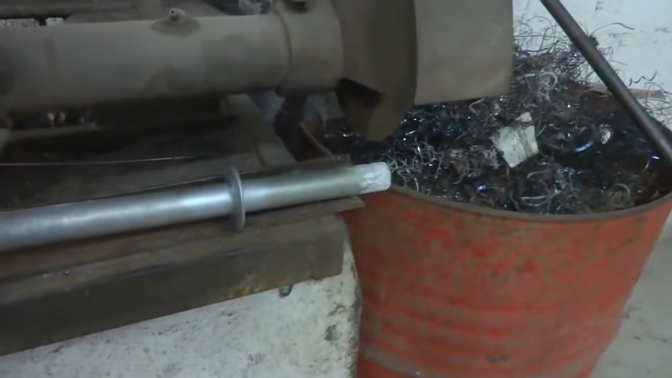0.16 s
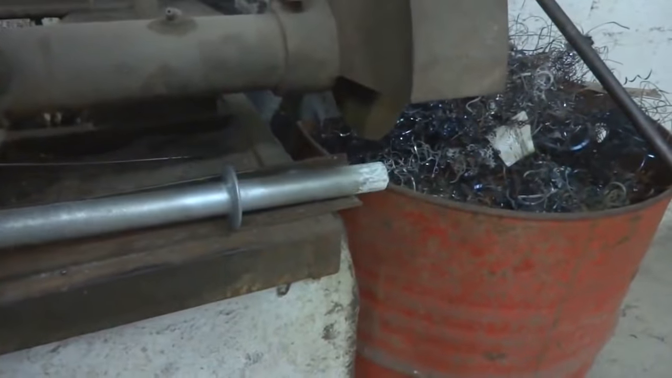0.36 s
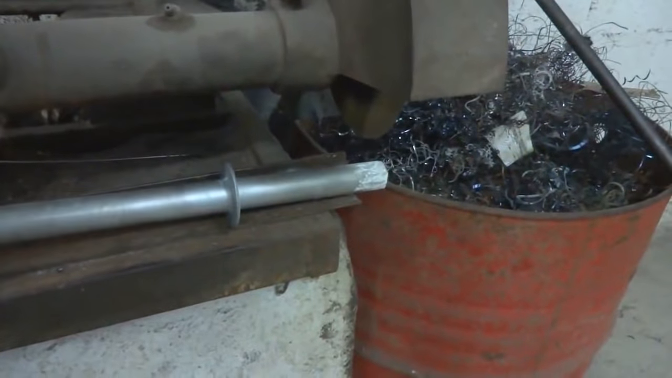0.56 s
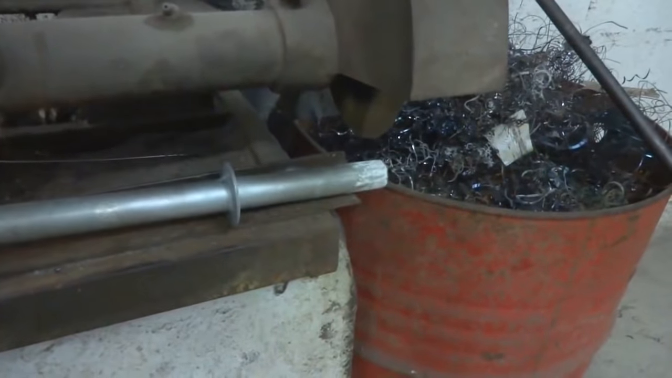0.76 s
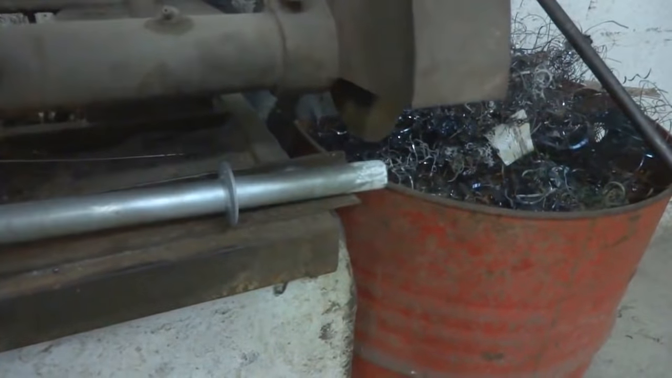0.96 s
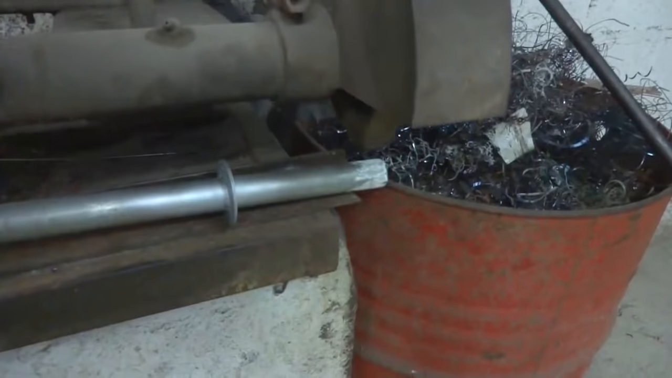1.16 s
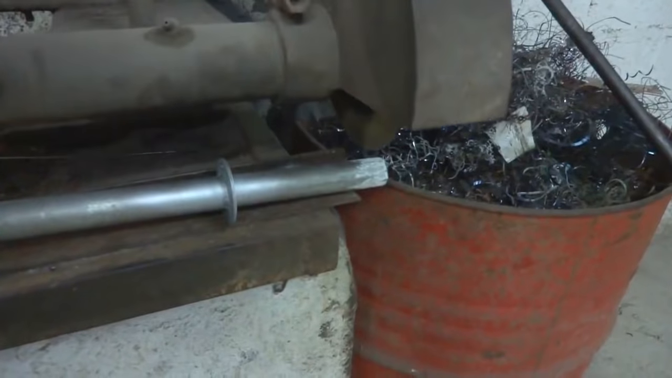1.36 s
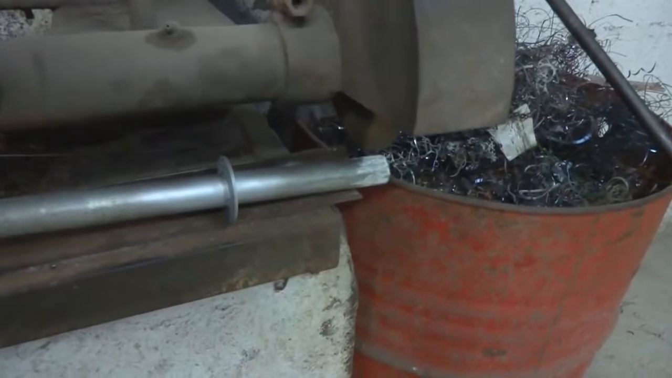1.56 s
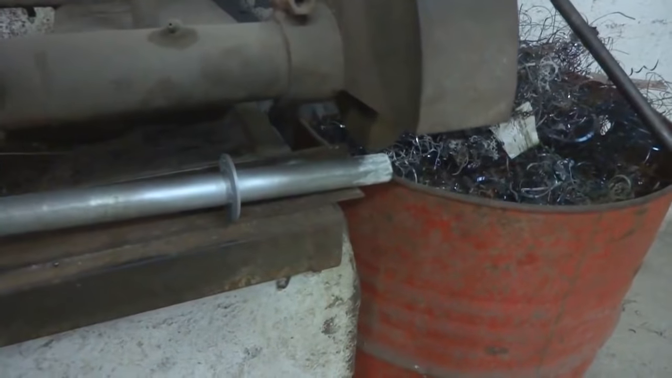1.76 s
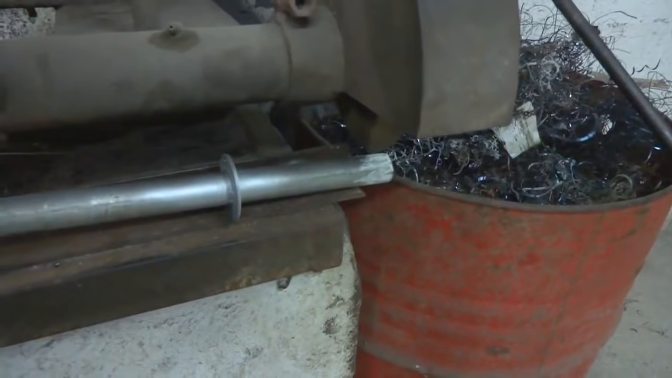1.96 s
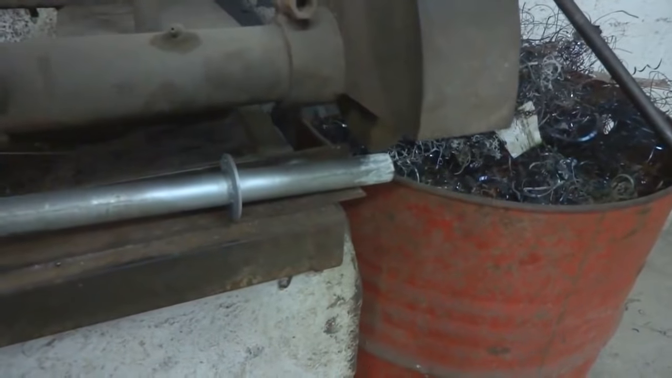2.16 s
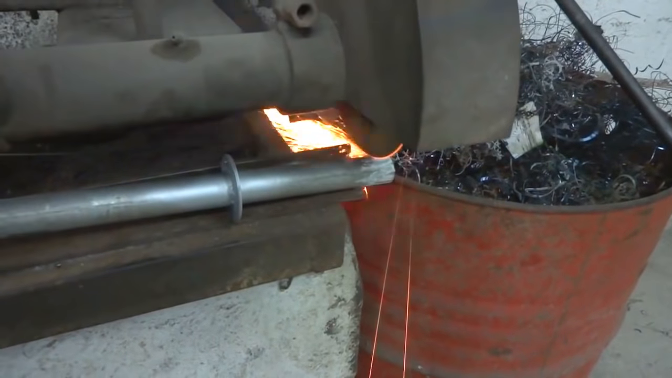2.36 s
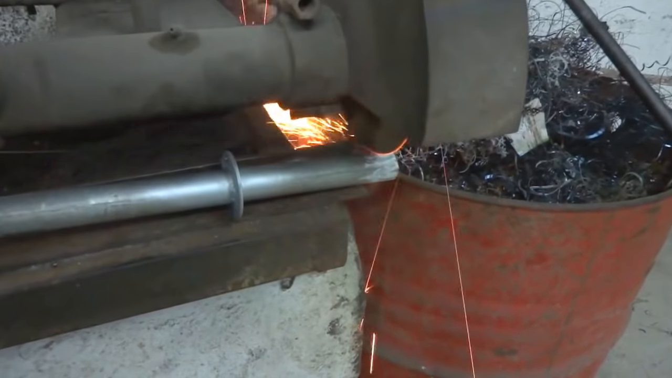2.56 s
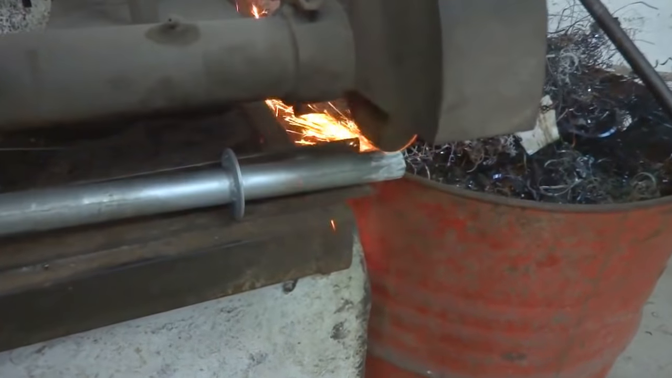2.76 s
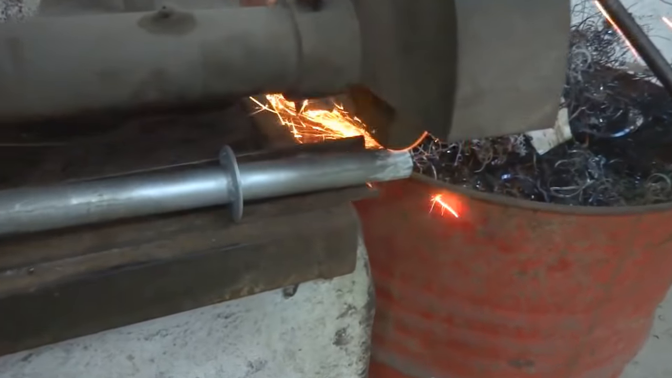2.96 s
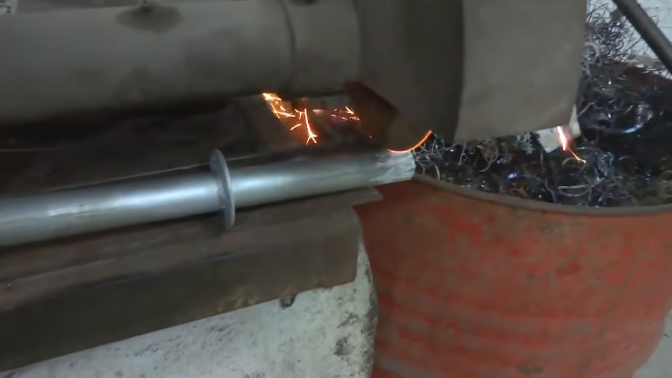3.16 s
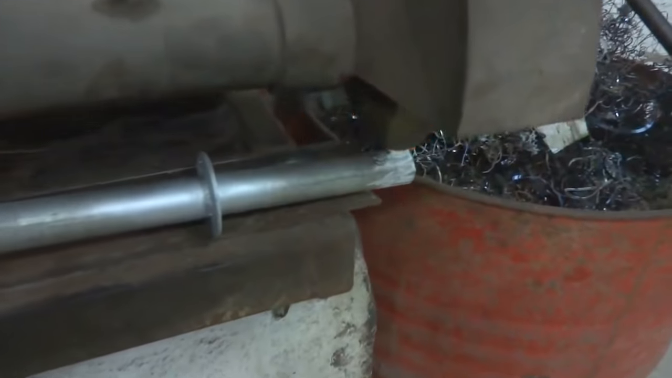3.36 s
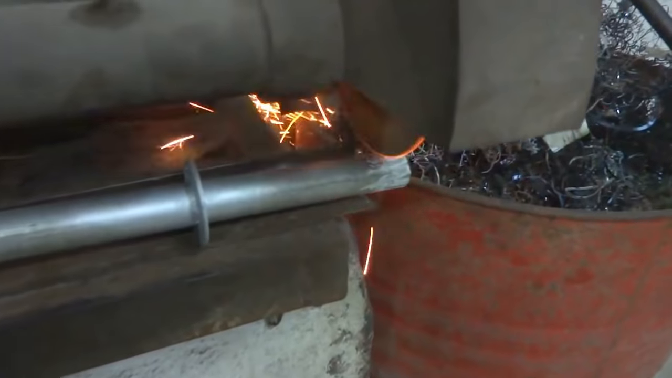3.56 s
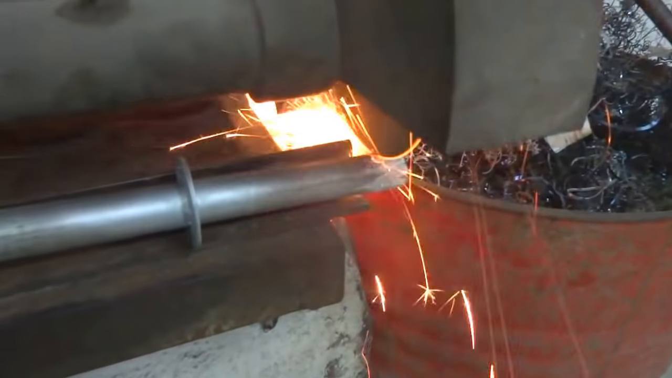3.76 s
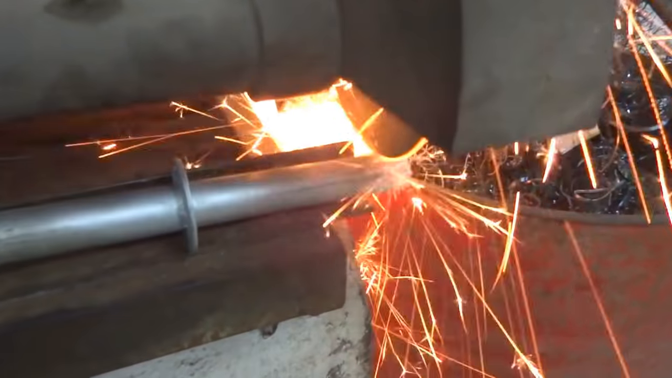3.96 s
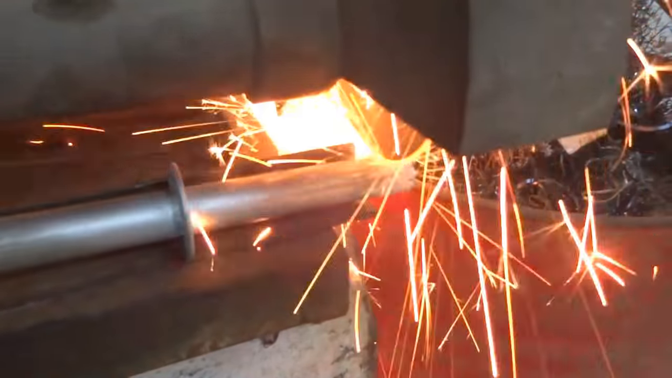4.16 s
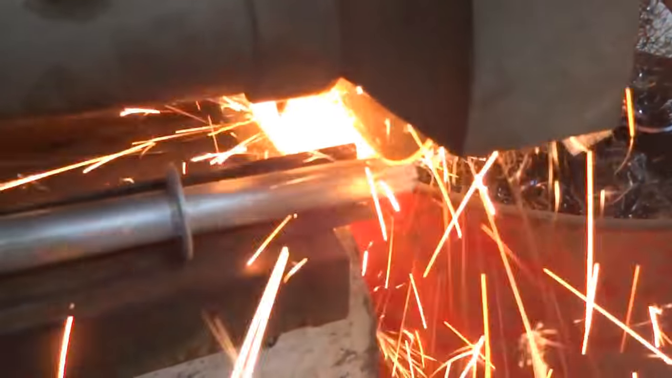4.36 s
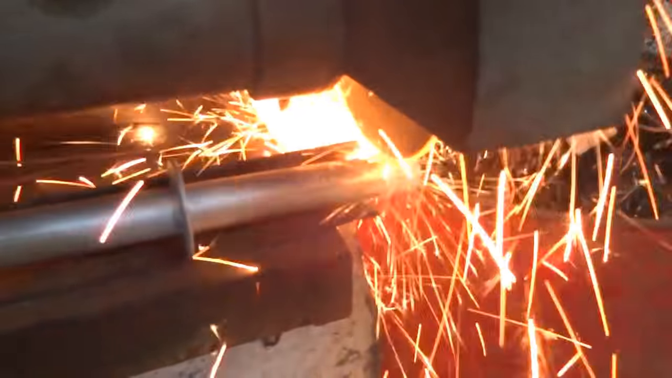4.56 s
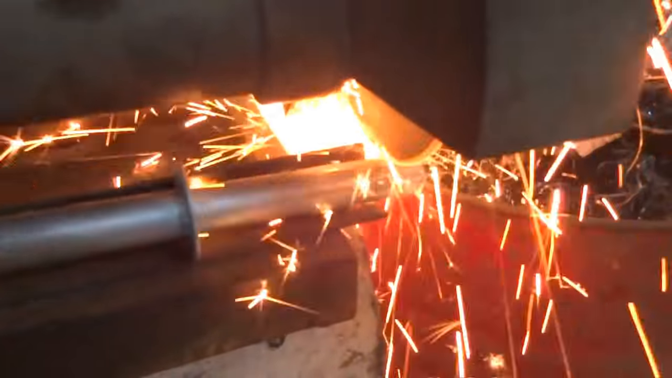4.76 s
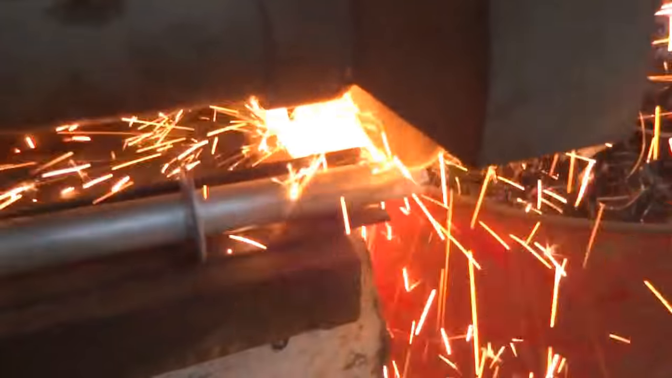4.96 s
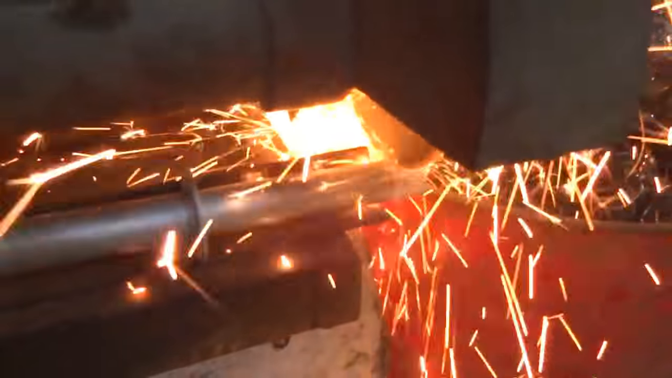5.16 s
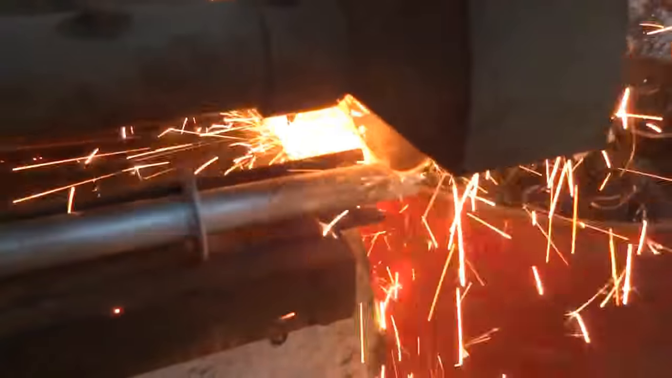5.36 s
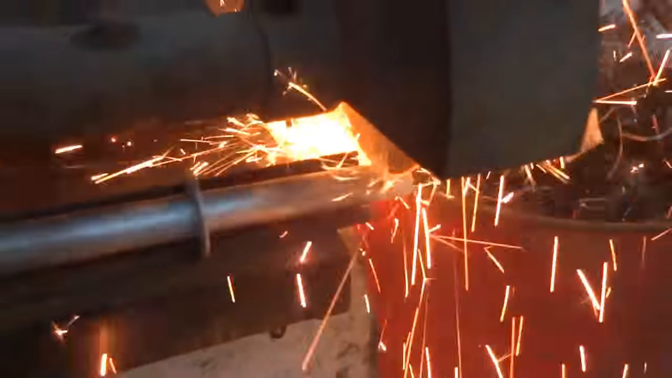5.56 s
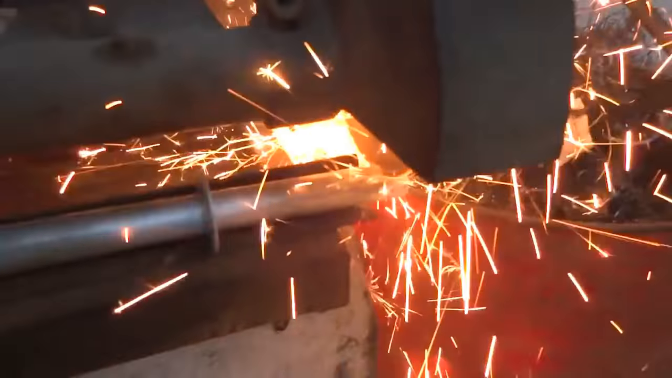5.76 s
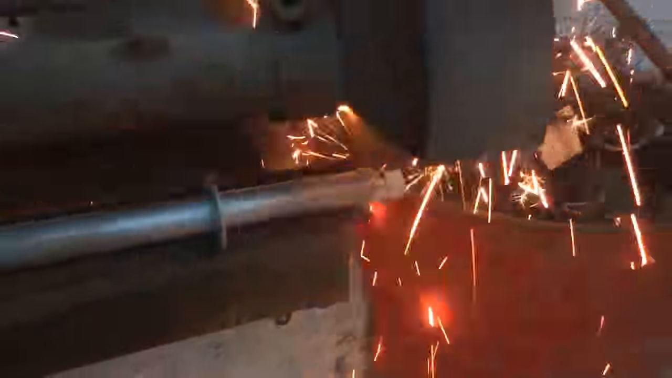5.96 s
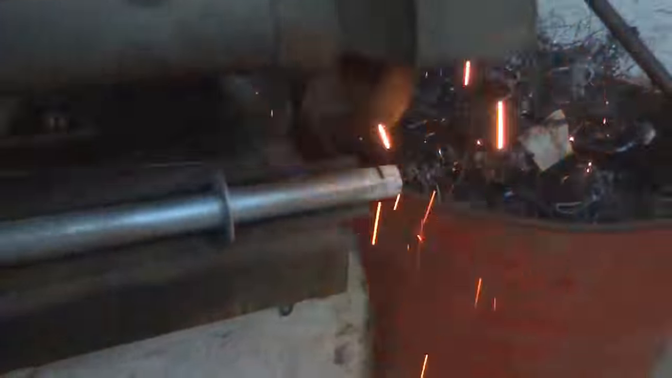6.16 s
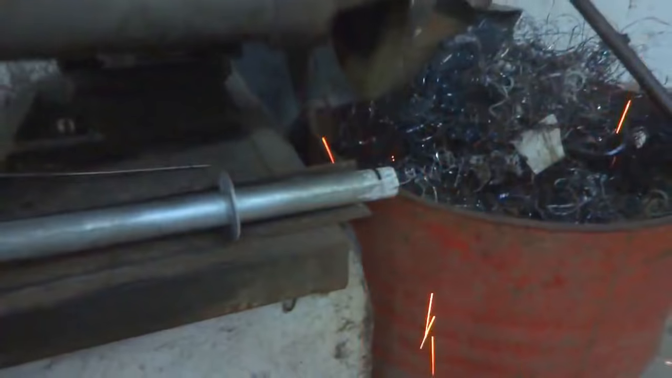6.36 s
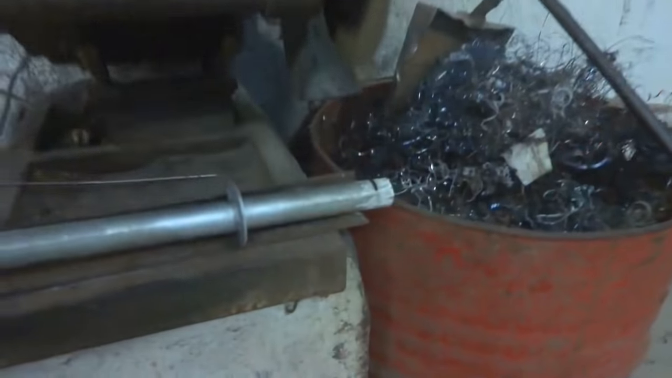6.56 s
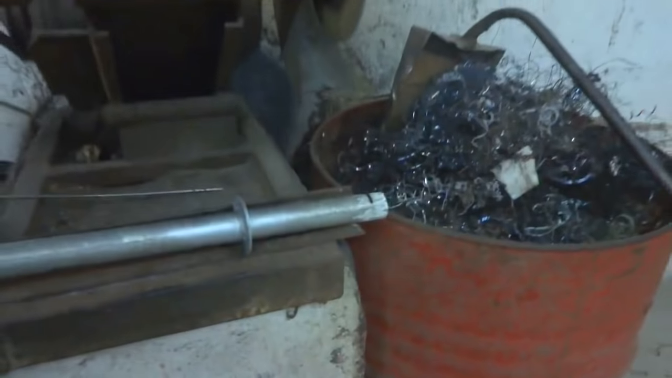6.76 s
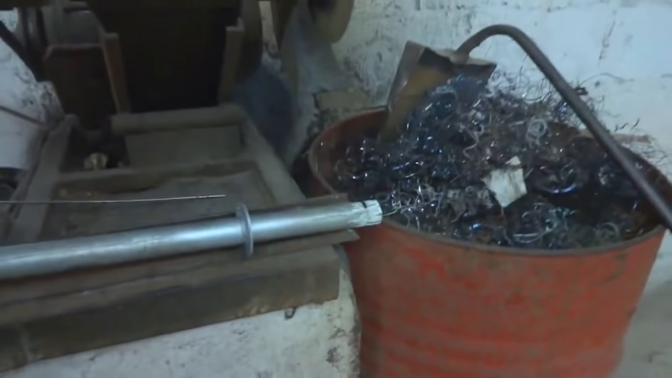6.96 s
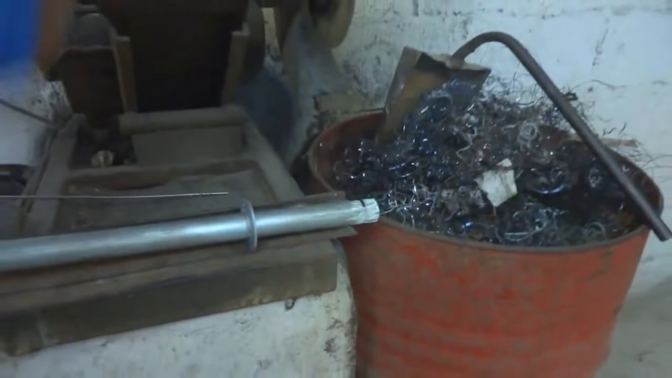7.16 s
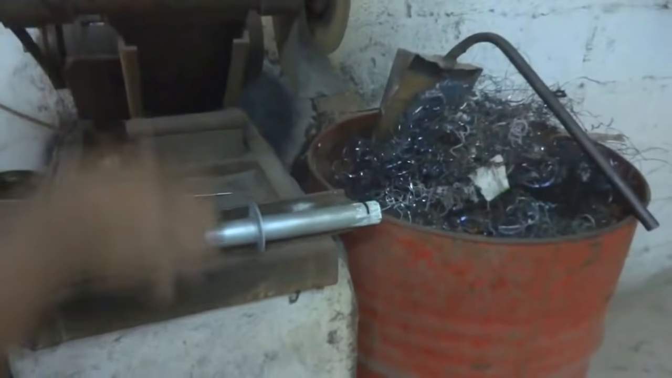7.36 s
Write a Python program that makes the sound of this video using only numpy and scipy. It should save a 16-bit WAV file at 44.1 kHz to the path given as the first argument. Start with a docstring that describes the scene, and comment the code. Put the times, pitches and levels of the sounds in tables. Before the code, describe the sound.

Whining motor and rattling housing idle, an abrasive wheel stutters against steel, then screams through a long cut before the arm rises and bumps its stop.

```python
"""A belt-driven abrasive cut-off saw in a small workshop, heard from about a metre.
The drive idles, humming and rattling its housing in step with motor and belt; the slack belt slaps its cover.
The wheel skips on a steel pipe, lifts, then sinks in for one long cut: revolving grit excites the modes of
pipe and guard, narrow modes swell and squeal, and the wheel slows under load.
Steel rings on as the arm swings up; the arm bumps its stop, struck modes ring, and pulsing tones drone there."""
import sys
import numpy as np
from scipy import signal
from scipy.fft import rfft, irfft
from scipy.io import wavfile
from scipy.ndimage import uniform_filter1d, map_coordinates

SR = 44100
rng = np.random.default_rng(int(sys.argv[2]) if len(sys.argv) > 2 else 0)


def to_wav(sig):
    """Store sig (one row per channel, or 1-D mono) as 16-bit WAV at the path in sys.argv[1].

    Samples outside -1..1 are clipped; the rate is SR.
    """
    pcm = np.clip(np.atleast_2d(sig), -1, 1) * 32767
    pcm = np.round(pcm).astype(np.int16)
    wavfile.write(sys.argv[1], SR, pcm.T)  # frames by channels


N = 327222
T = np.arange(N) / SR
FREQ = np.maximum(np.arange(N + 1) * SR / (2 * N), 1)

MOTOR_HZ = 24.92  # mean turns per second
# arm meeting its stop: (time [s], level [dB])
KNOCKS = [(6.885, -36), (6.916, -44)]


def undb(db):
    """Decibels to gain."""
    return np.exp(np.asarray(db) * (np.log(10) / 20))


def curve(rows):
    """Each column of a table as straight lines through time."""
    time_s, *columns = np.transpose(rows)
    return [np.interp(T, time_s, column) for column in columns]


def ramp(start_s, length_s):
    """A straight rise from 0 to 1."""
    return np.clip((T - start_s) / length_s, 0, 1)


def swell(centre_s, spread_s):
    """A Gaussian rise and fall around one moment."""
    return np.exp(-np.minimum(((T - centre_s) / spread_s) ** 2 / 2, 20))


def walk(rate_hz):
    """Smoothed random steps with a spread near 1."""
    step = int(SR / rate_hz)
    steps = np.repeat(rng.standard_normal(N // step + 1), step)
    return 1.282 * uniform_filter1d(uniform_filter1d(steps, step), step)[:N]


def colour(x, points, modes=()):
    """Minimum-phase filter: a smooth spectrum lifted at each resonance; output rms 1."""
    hz, db = np.transpose(points)
    db = np.interp(np.log(FREQ), np.log(hz), db)
    db = db + sum(lift / (1 + (2 * (FREQ - f) / width) ** 2) for f, width, lift in modes)
    cepstrum = irfft(np.log(undb(db)))[:N]  # causal half
    response = np.exp(rfft(2 * cepstrum, 2 * N))
    y = irfft(rfft(x, 2 * N) * response)[:N]
    return y / y.std()


def bent(x, points, modes, ratio):
    """A colour whose middle resonances move by a ratio through time; the lowest and highest stay put."""
    samples = np.arange(N)
    clock = np.cumsum(ratio)
    # warp time, filter, unwarp: only the filter's pitch moves
    stretched = map_coordinates(x, [np.interp(samples, clock, samples)], order=3)
    moved = map_coordinates(colour(stretched, points, modes), [clock], order=3, mode="mirror")
    still = colour(x, points, modes)
    middle = signal.butter(8, [1650, 5000], "band", fs=SR, output="sos")
    return still + signal.sosfiltfilt(middle, moved - still)


def split(x, hz):
    """The parts below and above a frequency, each at rms 1."""
    filters = [signal.butter(6, hz, kind, fs=SR, output="sos") for kind in ("low", "high")]
    parts = [signal.sosfilt(sos, x) for sos in filters]
    return [part / part.std() for part in parts]


def surface(turns, keep, grit_db):
    """Impacts from a rough revolving surface: a share repeats on the next turn, the rest wears away."""
    count = int(turns[-1]) + 2
    shape = (count, N // count)  # turns x points round the rim
    keep = np.clip(keep, 0, .995)
    coarseness_db = grit_db * rng.exponential(size=shape).clip(0, 7)
    fresh = rng.standard_normal(shape) * undb(coarseness_db)
    fresh[1:] *= np.sqrt(1 - keep ** 2)  # level stays even from turn to turn
    rim = signal.lfilter([1], [1, -keep], fresh, axis=0).ravel()
    return map_coordinates(rim, [turns * shape[1]], order=3) / rim.std()


def shaken(hz, rate_hz):
    """A mode shaken at random: a narrow band around a pitch that may move."""
    phase = 2 * np.pi * np.cumsum(hz * np.ones(N)) / SR
    return walk(rate_hz) * np.cos(phase) + walk(rate_hz) * np.sin(phase)


def sagging(hz, time_s, speed, share):
    """A pitch that is hz at one moment and follows a share of the wheel's change of speed."""
    return hz * (1 + share * (speed / np.interp(time_s, T, speed) - 1))


def struck(blows, modes, push_s):
    """Blows that ring a set of decaying modes; a longer push is duller."""
    age = T[:SR // 4]
    ring = sum(undb(db) * np.exp(-np.log(1000) * age / t60_s) * np.sin(2 * np.pi * hz * age)
               for hz, db, t60_s in modes)
    hits = np.zeros(N)
    for time_s, db in blows:
        hits[int(time_s * SR)] = undb(db)
    return signal.fftconvolve(hits, ring * (1 - np.exp(-age / push_s)))[:N]


def grind():
    """Grit tears at the steel, hardest once a turn at the wheel's high spot; the colour shifts with depth."""
    # wheel speed: (time [s], speed [turns/s])
    wheel = [(0, 62.5), (2.4, 62.5), (2.9, 61), (3.5, 62.4), (3.8, 61.4), (4.2, 59.9), (4.75, 59),
             (5.17, 56.2), (5.3, 57.5), (5.38, 59.2), (5.92, 60.3), (6.2, 62.5)]
    # how deep the wheel sits in the steel: (time [s], depth [0-1])
    depth_points = [(2.4, 0.14), (3.2, 0), (3.6, 0.13), (4.1, 0.32), (4.6, 0.3), (5.1, 0.55), (5.5, 0.7),
                    (5.9, 0.8), (6.05, 0.8)]
    # rasp colour on the surface: (frequency [Hz], level [dB])
    skim = [(50, -51), (150, -44), (350, -12), (600, -12.5), (900, -7), (1500, -4), (2400, 8.5),
            (3600, -5.5), (5000, -3.5), (8000, -2), (11000, -8.5), (13000, -15.5), (15300, -10)]
    # rasp colour deep in the kerf: (frequency [Hz], level [dB])
    deep = [(50, -32.5), (150, -17), (350, -18), (600, -15), (900, -8), (1500, -5), (2400, -2.5),
            (3600, -7), (5000, -4.5), (8000, -2.5), (11000, -7.5), (13000, -15.5), (15300, -10)]
    # resonances of pipe and guard: (frequency [Hz], width [Hz], lift [dB])
    pipe = [(740, 60, 5), (1000, 70, 6), (1140, 90, 2), (1292, 80, 12), (1440, 68, 10), (2300, 140, 6),
            (2620, 288, 6), (2900, 260, 9.5), (3130, 140, -3), (3413, 382, 10.5), (3711, 300, 14),
            (4000, 150, -2), (4254, 340, 13), (4740, 300, 7), (5420, 380, 8.5), (5900, 400, 6),
            (6875, 350, 7), (7480, 250, 3), (9100, 700, 7.5), (9780, 300, 4), (10600, 750, 9.5),
            (12050, 650, 11), (13350, 1000, 13)]
    pipe_sag, pipe_wander, cutting_turns_per_s = 0.35, .003, 60.6
    spit_low_hz, spit_high_hz = 4560, 11600
    sunk_depth = 0.61  # from here on the rasp has only the kerf colour

    speed = curve(wheel)[0]
    turns = np.cumsum(speed) / SR
    depth = np.clip(curve(depth_points)[0], 0, 1)
    high_spot = np.exp(-(turns % 1) / .25)
    flutter_db = (1.6 + 2.6 * depth) * high_spot
    grit = surface(turns, keep=0.34, grit_db=2.07) * undb(flutter_db + 0.066 * walk(90))
    grit = thin_steel(grit, t60_s=.05, ring_db=-7)

    shudder_skim, rasp_skim = split(colour(grit, skim, pipe), hz=1410)
    bend = 1 + pipe_sag * (speed / cutting_turns_per_s - 1) + pipe_wander * walk(12)
    shudder_deep, rasp_deep = split(bent(grit, deep, pipe, bend), hz=1560)
    sparse_grit = colour(surface(turns, keep=0.2, grit_db=3.7), skim, pipe)
    spit = split(split(sparse_grit, hz=spit_low_hz)[1], hz=spit_high_hz)[0]

    rasp_gain, shudder_gain, spit_gain = contact()
    sunk = np.clip(depth / sunk_depth, 0, 1)
    rasp = (1 - sunk) * rasp_skim + sunk * rasp_deep
    shudder = (1 - depth) * shudder_skim + depth * shudder_deep
    singing = kerf_rings(turns, speed, depth) + chatter(speed)
    cut = rasp_gain * (undb(-2.5) * rasp + singing)
    return cut - undb(-3.5) * shudder_gain * shudder + spit_gain * spit


def contact():
    """Gains of rasp, shudder and spit: each touch spits, holds and lets go; the shudder builds up behind it."""
    # touches of wheel on pipe, the long cut among them: (start [s], attack constant [s], length [s],
    # release constant [s], rasp [dB], shudder [dB], spit [dB])
    touches = [ (2.392, 0.0055, 0.1, 0.1, -16.5, -19.5, -15.5),
               (2.563, 0.0063, 0.1, 0.043, -15.5, -20.5, -15),
               (2.691, 0.0037, .092, 0.048, -15.5, -18, -16.5),
               (2.815, 0.0041, .093, .012, -16, -17.5, -15.5),
               (2.915, 0.0079, 0.095, .035, -15.5, -20, -14.5),
               (3.019, 0.005, 0.082, 0.047, -15.5, -19, -18), (3.134, 0.0056, .06, 0.07, -16.5, -23, -15),
               (3.546, 0.0011, .074, 0.043, -15.5, -18, -21),
               (3.674, 0.0038, 0.09, 0.014, -16.5, -19.5, -19),
               (3.771, .0043, 2.156, 0.038, -15.5, -20.5, -22),
               (5.916, .003, .093, 0.045, -19.5, -23.5, -40), ]
    spit_s = 0.03
    shudder_build_s = 0.018  # the frame starts shaking after the grit bites
    # the deepening kerf steadies the wheel
    steady_from_s, steady_takes_s, steady_db = 4.36, 0.77, -9.5

    rasp, shudder, spit = np.zeros((3, N))
    for start_s, attack_s, length_s, release_s, rasp_db, shudder_db, spit_db in touches:
        age = np.maximum(T - start_s, 0)
        gate = (1 - np.exp(-age / attack_s)) * np.exp(-np.maximum(age - length_s, 0) / release_s)
        build = 1 - np.exp(-(age / shudder_build_s) ** 2)
        rasp = np.maximum(rasp, gate * undb(rasp_db))
        shudder = np.maximum(shudder, gate * undb(shudder_db) * build)
        spit = spit + gate * undb(spit_db) * np.exp(-age / spit_s)
    return rasp, shudder * undb(steady_db * ramp(steady_from_s, steady_takes_s)), spit


def thin_steel(x, t60_s, ring_db):
    """A thicket of short, high modes in pipe wall and guard, as decaying high-passed noise."""
    age = T[:SR // 10]
    ring = rng.standard_normal(len(age)) * np.exp(-np.log(1000) * age / t60_s)
    high = signal.butter(3, 5500, "high", fs=SR, output="sos")
    ring = signal.sosfilt(high, ring / np.linalg.norm(ring))
    return x + undb(ring_db) * signal.fftconvolve(x, ring)[:N]


def kerf_rings(turns, speed, depth):
    """During touches and the long cut, steel modes swell, fade and bend with wheel speed, nudged once a turn."""
    # steel modes that swell around given moments:
    # (time [s], spread [s], frequency [Hz], random rate [Hz], level [dB])
    kerf_modes = [ (2.92, 0.065, 1437, 60, -5.5), (2.84, 0.071, 1136, 60, -11),
                  (2.95, 0.23, 4270, 219, -16), (3.18, 0.022, 1306, 50, -6), (3.22, .09, 2930, 260.2, -9),
                  (3.721, 0.021, 1285, 49.97, -6), (3.72, 0.13, 2605, 169.5, -11.5),
                  (3.82, 0.1, 5440, 319, -13), (4.4, 0.34, 10470, 652, -13), (4.45, 0.51, 9360, 700, -16.5),
                  (4.701, 0.77, 826.5, 69.9, -21), (4.75, 0.087, 6040, 220, -14),
                  (4.9, 0.6, 1896, 139.8, -15), (4.9, 0.14, 10600, 300, -13), (5.2, 0.31, 5650, 482, -12),
                  (5.38, .2, 6850, 522, -16), (5.52, 0.27, 7560, 448, -12.5),
                  (5.7, 0.28, 3725, 159.2, -16.5), (5.74, .14, 8570, 1002, -11),
                  (5.96, 0.14, 2800, 282, -10), (5.95, 0.053, 4290, 80, -10), ]
    mode_sag = .4
    out = slot(depth)
    for time_s, spread_s, hz, rate_hz, db in kerf_modes:
        pitch_hz = sagging(hz, time_s, speed, mode_sag)
        out = out + undb(db) * swell(time_s, spread_s) * shaken(pitch_hz, rate_hz)
    nudge_db = 2.0 * np.cos(2 * np.pi * (turns - .15))
    return out * undb(nudge_db)


def slot(depth):
    """The slot resonates with the flying grit: a bright band that climbs and grows with depth."""
    half_depth_hz, octaves_per_depth, rate_hz, full_depth_db = 5580, 1.55, 1400, -13
    pitch_hz = half_depth_hz * 2 ** (octaves_per_depth * (depth - .5))
    return undb(full_depth_db) * depth ** 2 * shaken(pitch_hz, rate_hz)


def chatter(speed):
    """Wheel and pipe fall into step for a moment and squeal, sagging with the wheel's speed."""
    # squeals: (time [s], spread [s], frequency [Hz], relative level [dB])
    squeals = [(3.2, .06, 738, -15), (4.1, .2, 832, -18), (4.2, .2, 240, -37), (4.6, .18, 356, -27),
               (4.68, .14, 2900, -10), (4.72, .1, 4130, -13), (4.76, .06, 2302, -9.5), (4.92, .1, 1912, -9),
               (4.97, .1, 2700, -13), (5, .12, 3580, -14), (4.99, .1, 2295, -11), (5.04, .09, 4260, -10),
               (5.18, .06, 1975, -13.5), (5.2, .12, 398, -34), (5.26, .045, 1840, -11),
               (5.27, .06, 2335, -13), (5.46, .07, 3725, -11), (5.57, .1, 2905, -13)]
    offset_db, sag_share = 1, .9
    out = 0
    for time_s, spread_s, hz, db in squeals:
        phase = 2 * np.pi * np.cumsum(sagging(hz, time_s, speed, sag_share)) / SR
        gain = swell(time_s, spread_s) * undb(offset_db + db + 1.5 * walk(40))
        out = out + gain * np.sin(phase + .35 * walk(50))
    return out


def lift_ring():
    """The freed wheel and its guard ring on while the arm swings up, as randomly shaken modes."""
    # steel modes: (frequency [Hz], random rate [Hz], relative level [dB])
    lift_modes = [(1305, 41, -44), (1460, 35, -46), (1480, 35, -43.5), (2340, 230, -47), (3030, 100, -46),
                  (3550, 140, -45.5)]
    # common level of the modes: (time [s], level [dB])
    lift_level = [(5.9, -43), (6.07, 2), (6.19, 1.5), (6.38, -1), (6.67, 4.5), (6.82, -4), (7, -45)]
    modes = sum(undb(db) * shaken(hz, rate_hz) for hz, rate_hz, db in lift_modes)
    return undb(curve(lift_level)[0]) * modes


def drive():
    """The belt laps once in two motor turns; its slaps and the bearings rattle the housing."""
    # housing colour: (frequency [Hz], level [dB])
    body = [(50, -29), (150, -20), (235, -15.5), (310, -20.5), (385, -8.5), (445, -4.5), (570, -7),
            (760, 3.5), (1200, -1), (2000, -9), (4000, -6.5), (5800, -13.5), (9000, -9.5), (11400, -8),
            (13300, -23), (15300, -29)]
    # housing resonances: (frequency [Hz], width [Hz], lift [dB])
    housing = [(942, 28, 7), (1068, 61, 8), (1291, 142, 9), (1439, 50, 11), (1486, 48, 9)]
    # resonances and hollows of the wheel guard: (frequency [Hz], width [Hz], lift [dB])
    guard = [(1788, 42, 11), (1880, 100, -3), (2347, 120, 7), (2464, 60, 11.5), (2600, 96, 5),
             (2790, 45, 4), (2868, 55, -4), (2985, 95, 8), (3085, 100, -6), (3560, 260, 6), (3814, 90, 7),
             (4000, 90, 7), (4117, 54, 8), (4210, 70, -3), (4484, 170, 7), (5030, 133, 5), (10809, 403, 3)]
    # colour of air dragged round by the wheel: (frequency [Hz], level [dB])
    air_colour = [(100, -55), (400, -31), (600, -8), (880, 2), (1400, 2), (2000, 1), (3400, 2.5),
                  (5800, -5.5), (9000, -6.5), (11400, -1.5), (13300, -17), (15500, -15)]
    # level laws of the parts: (level at drive level 0 [dB], slope [dB/dB],
    # change as the arm is raised [dB], middle of that change [s])
    rattle_law = (-25.5, 1.04, -3, 6.5)
    rumble_law = (-38.5, 1.47, 9.5, 7)
    air_law = (-30.5, 1.01, 2.5, 6.5)
    hum_law = (4, 1.58, -2, 7)
    whine_law = (1.5, 0.9, -7, 6)

    turns = np.cumsum(MOTOR_HZ * (1 + 0.001215 * walk(4))) / SR
    lap = np.pi * turns
    throb_db = .6 * np.cos(lap) + 1.5 * np.cos(2 * lap) + 1.6 * np.cos(3 * lap)
    impacts = surface(turns / 2, keep=.91, grit_db=3.0) * undb(.65 * throb_db)
    rattle = split(colour(impacts, body, housing + guard), hz=790)[1]
    # the heavy frame blurs the pattern, so the rumble repeats less exactly
    rumble = split(colour(surface(turns / 2, keep=0.37, grit_db=1.1), body), hz=740)[0]
    air = colour(rng.standard_normal(N), air_colour, guard) * undb(1.8 * walk(20))

    noise = rattle * drive_gain(rattle_law) + rumble * drive_gain(rumble_law) + air * drive_gain(air_law)
    tones = hum(turns, throb_db) * drive_gain(hum_law) + whine(turns, throb_db) * drive_gain(whine_law)
    return noise + tones + drone()


def drive_gain(law):
    """Gain of one part of the drive: it follows the drive's level and shifts as the arm is raised."""
    # level of the whole drive: (time [s], level [dB])
    drive_level = [(0, -6), (.85, -4.5), (1.1, -3), (2.385, 0), (2.44, -6.5), (3.45, -4), (4.3, -11),
                   (6.1, -9.5), (6.4, -10), (7.42, -9.5)]
    shift_s = 0.21  # each part's level shifts over this time
    db, slope, raised_db, raised_s = law
    shift_db = raised_db * ramp(raised_s - shift_s / 2, shift_s)
    return undb(db + slope * curve(drive_level)[0] + shift_db)


def hum(turns, throb_db):
    """Tones of motor and belt; they waver, and the higher ones flutter more with the belt."""
    # wavering drive tones: (frequency [Hz], relative level [dB])
    hum_tones = [(62.6, -74), (124.6, -67), (225, -63), (447, -51), (672.9, -42.5), (823.6, -50),
                 (861.3, -49.5)]
    phase = 2 * np.pi * turns / MOTOR_HZ
    out = 0
    for hz, db in hum_tones:
        gain = undb(db + 1.3 * walk(9) + throb_db * min(hz / 600, 2))
        out = out + gain * np.sin(hz * phase + .5 * walk(14))
    return np.sqrt(2) * out


def whine(turns, throb_db):
    """Clear whining drive tones, locked to the motor; neighbours beat, the upper ones throb with the belt."""
    # whining drive tones: (frequency [Hz], relative level [dB])
    whine_tones = [(188.4, -59), (511.4, -52.5), (1071.4, -40), (1270.92, -45), (1295.84, -36.5),
                   (1333.22, -42), (1437, -44), (1793.5, -45.5), (2467, -44.5), (2991, -52), (3539, -48.5),
                   (3601, -50), (4124, -50)]
    phase = 2 * np.pi * turns / MOTOR_HZ
    waver_db = walk(8)
    out = 0
    for hz, db in whine_tones:
        gain = undb(db + waver_db + throb_db * (hz > 1000))
        out = out + gain * np.cos(hz * phase + .3 * walk(8))
    return np.sqrt(2) * out


def drone():
    """On its stop the arm starts to drone, pulsing once for each lap of the belt."""
    # tones of the resting arm: (frequency [Hz], relative level [dB])
    drone_tones = [(187, -16.5), (495, -8.5), (824, 0.5), (1071, -23), (2288, -6), (3280, -7)]
    drone_db, build_s, pulse_depth_db = -43.5, 0.14, 3.5
    age = np.maximum(T - KNOCKS[0][0], 0)
    tones = sum(undb(db + 1.2 * walk(18)) * np.sin(2 * np.pi * hz * T + .55 * walk(30))
                for hz, db in drone_tones)
    pulse_db = pulse_depth_db * np.cos(np.pi * MOTOR_HZ * age)
    return np.sqrt(2) * tones * undb(drone_db + pulse_db) * (1 - np.exp(-age / build_s))


def knocks():
    """The slack belt slaps its cover at idle; the lifted arm bumps dully against its stop."""
    # belt slaps: (time [s], level [dB])
    slaps = [(1.538, -12), (1.948, -15), (2.38, -12)]
    # cover modes: (frequency [Hz], level [dB], t60 [s])
    cover = [(1070, -7, .025), (1297, 0, .035), (1440, -5, .03)]
    # arm modes: (frequency [Hz], level [dB], t60 [s])
    arm = [(335, -5, .12), (410, 0, .13), (600, -2, .12)]
    return struck(slaps, cover, push_s=0.00089) + struck(KNOCKS, arm, push_s=0.003)


def workshop(x, t60_s):
    """Dense echoes from bare walls, thin in the bass, as decaying band-passed noise."""
    age = T[:SR // 2]
    tail = rng.standard_normal(len(age)) * np.exp(-np.log(1000) * age / t60_s) * (age > .003)
    band = signal.butter(2, [750, 11500], "band", fs=SR, output="sos")
    tail = signal.sosfilt(band, tail / np.linalg.norm(tail))
    return signal.fftconvolve(x, tail)[:N]


def limiter(x):
    """A burst of treble turns the whole sound down for a moment."""
    threshold_db, release_s = -16.5, .02
    high = signal.butter(2, 5000, "high", fs=SR, output="sos")
    treble = signal.sosfilt(high, x.mean(axis=0))
    power = uniform_filter1d(treble ** 2, size=350)
    hold = np.exp(-1 / (release_s * SR))
    power = np.maximum(power, signal.lfilter([1 - hold], [1, -hold], power))
    excess = np.maximum(np.sqrt(np.abs(power)) / undb(threshold_db), 1)
    return x / excess ** .8


def scene():
    """The cut is straight ahead and the drive a little to the left; only the room is wide."""
    motor = drive()
    saw = grind() + lift_ring() + motor + knocks()
    mid = saw + undb(-12.5) * workshop(saw, t60_s=0.11)
    high = signal.butter(1, 300, "high", fs=SR, output="sos")
    side = undb(-17.5) * workshop(saw, t60_s=0.11) + undb(-33) * signal.sosfilt(high, motor)
    return np.array([mid + side, mid - side])


def record(dry):
    """Treble bursts duck the level, the highest peaks are rounded alike in both channels, the top is cut."""
    ceiling, top_hz = .68, 15800
    held = limiter(dry)
    rounded = held / (1 + (held.mean(axis=0) / ceiling) ** 4) ** (1 / 4)
    return signal.sosfilt(signal.ellip(10, .2, 80, top_hz, fs=SR, output="sos"), rounded)


dry = scene()
out = record(dry)
to_wav(out)
```